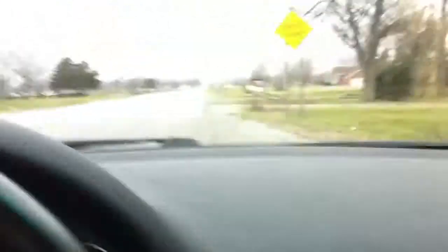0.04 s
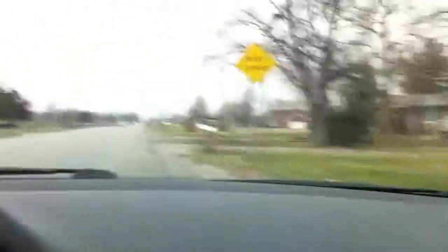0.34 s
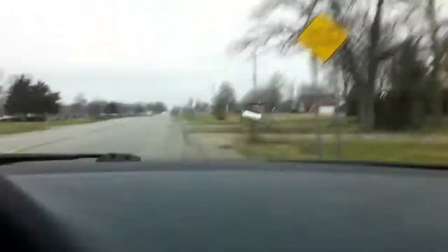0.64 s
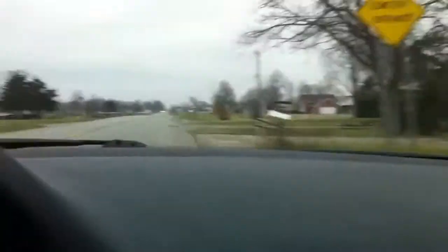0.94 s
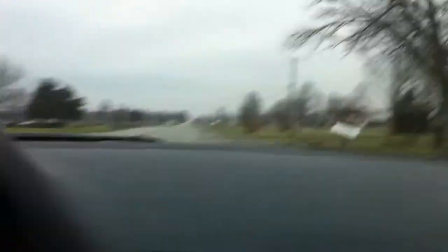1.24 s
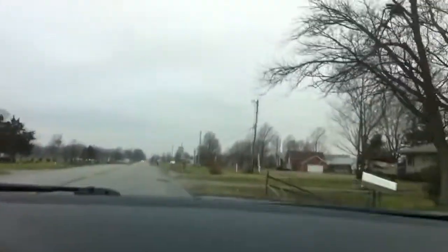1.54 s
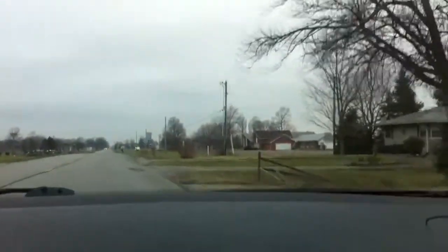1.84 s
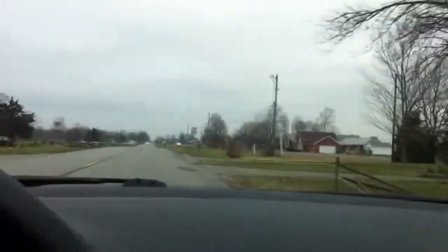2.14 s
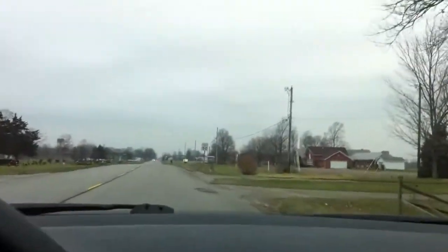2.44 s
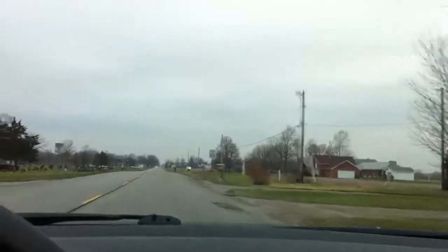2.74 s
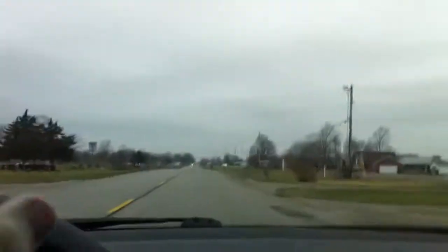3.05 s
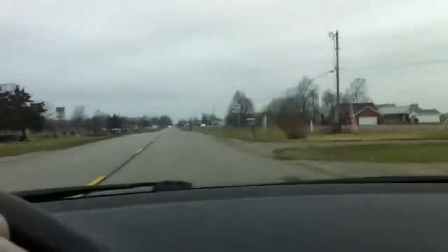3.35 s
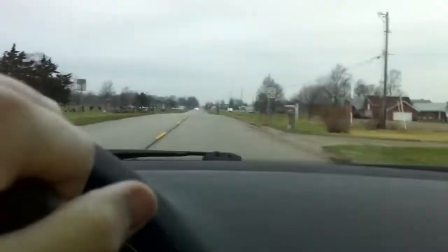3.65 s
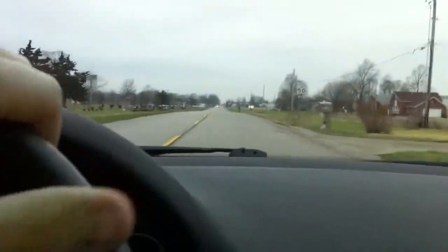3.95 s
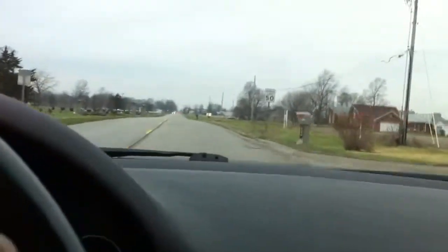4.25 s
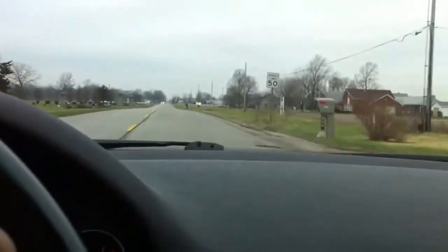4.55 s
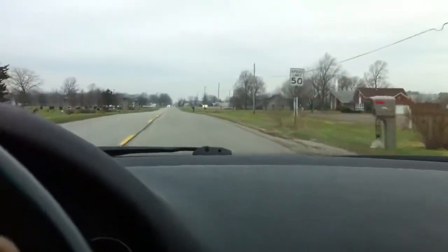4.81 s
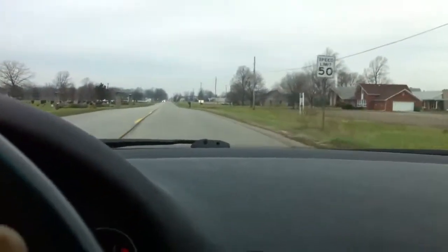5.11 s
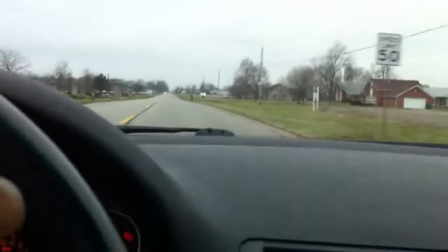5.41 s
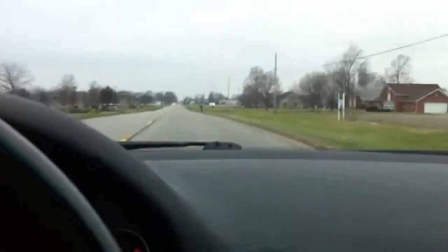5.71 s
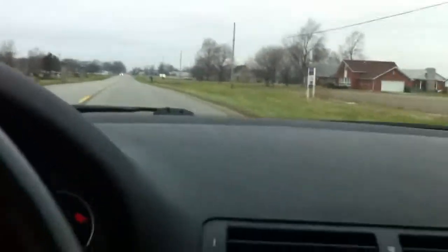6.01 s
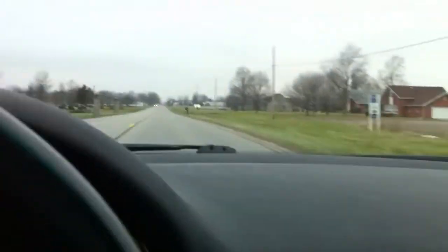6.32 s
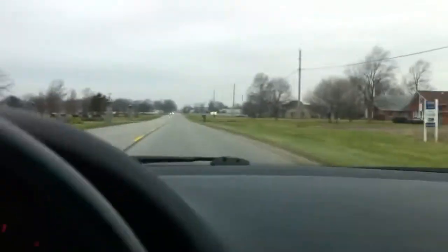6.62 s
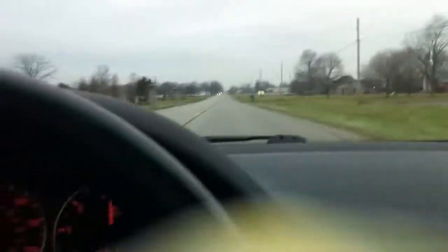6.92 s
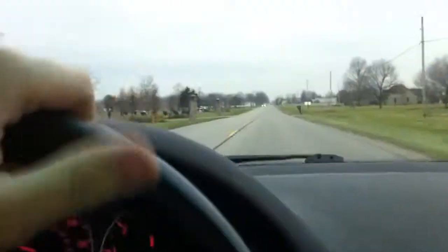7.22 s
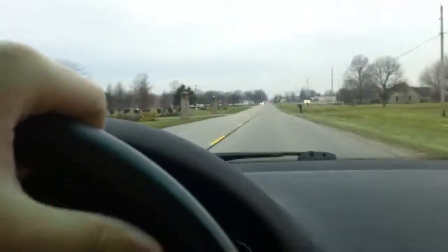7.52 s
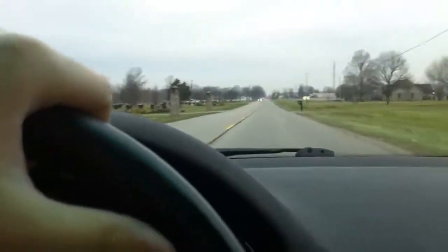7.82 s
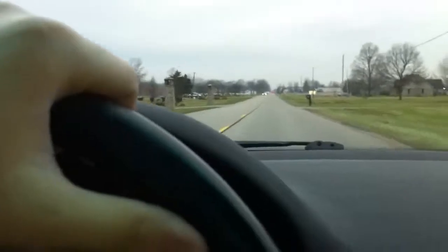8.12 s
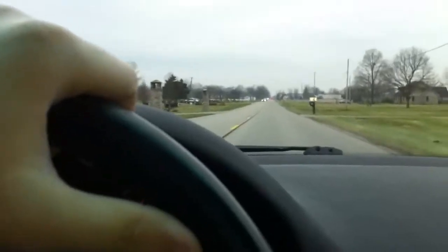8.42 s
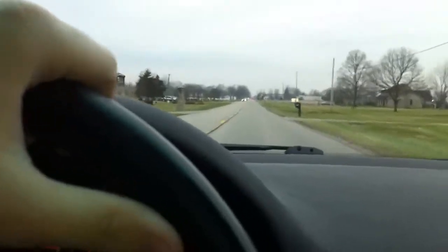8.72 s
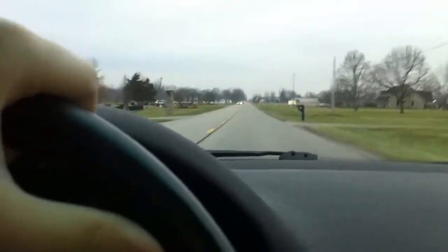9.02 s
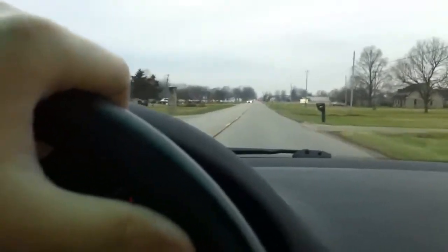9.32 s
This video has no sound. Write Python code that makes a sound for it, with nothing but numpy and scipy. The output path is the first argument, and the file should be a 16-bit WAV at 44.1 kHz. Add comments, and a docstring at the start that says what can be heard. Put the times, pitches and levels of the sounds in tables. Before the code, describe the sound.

A loud, rising axle whine fills a car cabin as the engine pulls through two upshifts above rumbling tyres.

```python
"""Inside a car accelerating through two upshifts. A worn rear axle whines at multiples of pinion speed.
The six-cylinder engine drops at each shift while the whine follows road speed; both sweep the
cabin's resonances. Tyres rumble underneath and loose trim knocks. Cloth rustles, and fingers
rub and tap the hand-held phone, whose case creaks."""
import sys
import numpy as np
from scipy import signal
from scipy.fft import rfft, irfft, next_fast_len
from scipy.io import wavfile

SR = 44100
rng = np.random.default_rng(int(sys.argv[2]) if len(sys.argv) > 2 else 0)


def generate_wav(signal):
    """Clip the signal to [-1, 1] and save it as 16-bit WAV at the path in sys.argv[1]."""
    frames = np.transpose(np.atleast_2d(signal))
    scaled = np.clip(frames, -1, 1) * 32767
    pcm = np.round(scaled).astype(np.int16)
    wavfile.write(sys.argv[1], SR, pcm)


N = 421596
T = np.arange(N) / SR

# tyre rumble: freq_hz, density_db
TYRE_SPECTRUM = [(25, -40), (55, -16.5), (90, -10.5), (125, 0.5), (170, 2), (260, -5), (380, -7),
                 (560, -11.5), (750, -19.5), (1000, -21), (1400, -29), (2000, -36.5), (3000, -39),
                 (5000, -54.5)]
# trim shaken by the road: freq_hz, width_hz, level_db
TRIM_MODES = [(750, 45, -57), (2434, 150, -71)]
# dull cabin bumps: start_s, pitch_hz, peak_db, t60_s
TRIM_KNOCKS = [(2.087, 810, -37, 0.055), (2.29, 760, -27, 0.028), (2.415, 56, -40, 0.21),
               (2.655, 520, -32, 0.064), (2.699, 477, -27.5, 0.034), (2.791, 524, -32, 0.036),
               (4.13, 700, -34, 0.026), (6.651, 620, -32, .03)]
# thin tones: centre_s, half_width_s, pitch_hz, level_db
SQUEAL_EVENTS = [(.13, 0.072, 1287, -61), (.48, .15, 1896, -67.5), (8.85, .2, 1850, -65)]
# cloth: centre_s, half_width_s, level_db
RUSTLE_EVENTS = [(0.317, 0.059, -57.5), (.734, 0.047, -58), (4.056, 0.097, -59.5)]
# cloth hiss: freq_hz, density_db
RUSTLE_SPECTRUM = [(800, -31), (2700, 1), (4400, -8), (5600, -1.5), (6500, -7), (9000, -12), (16000, -32)]

# fingers sliding until the hand settles: time_s, level_db
GRIP_LEVEL = [(0, -60), (1.1, -64.5), (1.7, -58), (2.65, -61.5), (3.0, -59.5), (4.4, -61), (5.5, -61),
              (6.15, -57), (7.3, -60), (7.7, -64)]
# skin hiss: freq_hz, density_db
GRIP_SPECTRUM = [(1500, -17.5), (4000, 3), (7000, -0.5), (10000, -0.5), (13000, 1), (16000, 9)]
# skin scuffs: centre_s, half_width_s, level_db, tilt_db_per_band
SCUFF_EVENTS = [(0.588, 0.028, -70, 10.5), (.801, 0.016, -66, -8), (1.3, .012, -65, 9),
                (1.476, .013, -61.5, 9), (1.527, 0.0075, -61, 20), (1.55, 0.017, -68, -6),
                (2.293, 0.025, -61, 4), (2.663, 0.024, -60.5, -1), (2.702, 0.025, -62, 1),
                (2.82, 0.047, -78, 16), (2.891, 0.017, -60, -4), (3.18, 0.033, -53.5, 2.5),
                (3.282, 0.021, -54.5, 1), (3.547, 0.018, -62.5, -14.5), (3.604, .012, -61, 8),
                (3.832, 0.014, -60, -6), (4.282, 0.009, -55, 0), (5.633, .035, -72, 8),
                (5.718, 0.057, -68, 4), (6.056, 0.068, -65, 1), (6.19, 0.021, -63, 3),
                (6.265, 0.008, -55.5, 0), (6.42, 0.067, -63.5, -1), (6.704, 0.033, -57.5, -5.5),
                (7.231, 0.024, -66.5, -10.5), (7.332, 0.039, -58, 2.5), (7.93, 0.015, -72, -19)]
# scuff noise bands: low_hz, high_hz
SCUFF_EDGES = [(900, 3500), (3500, 9000), (9000, 15800)]
# case creaks: start_s, level_db, decay_s
CREAK_EVENTS = [(1.54, -51, .012), (2.292, -47, .01), (2.694, -48.5, 0.014), (2.963, -57, .006),
                (3.543, -44.5, 0.016), (3.603, -47, 0.0096), (6.264, -46, 0.0065), (6.688, -54, .012),
                (7.926, -57, .008)]
# case rung by slips: freq_hz, width_hz, gain_db
CREAK_RESONANCES = [(1050, 200, -6), (1450, 200, -2), (1970, 170, 0), (2300, 160, -5), (2850, 400, -4),
                    (3700, 500, -7), (5200, 2000, -9)]
# finger taps: start_s, ring_peak_db, tick_db, tilt_db_per_octave
TAP_EVENTS = [(1.2394, -18.5, -39, .5), (1.539, -35, -58, -3), (3.273, -23.5, -52, -4),
              (3.405, -50, -52, 2), (3.603, -38, -46, 0)]
# first contact of a tap: freq_hz, density_db
TICK_SPECTRUM = [(1000, -22), (4000, -21), (6000, 11), (8000, 3), (11000, -22), (16000, -20)]
# case rung by a tap: freq_hz, gain_db, t60_s
CASE_MODES = [(1030, 0, .008), (1280, -6, .007), (2620, -2, .005), (3330, -3.5, .005), (7700, -5, .003)]

# three pulls, two upshifts: time_s, crank_hz
CRANK_SPEED = [(0, 40.6), (.75, 56), (1.2, 64.8), (1.7, 73.3), (1.94, 76), (2.15, 76.2), (2.35, 74.7),
               (2.87, 65.3), (3.23, 51.4), (3.43, 49.2), (3.65, 51.3), (4.55, 63.8), (4.8, 67.1),
               (5.54, 76), (5.8, 78.3), (6, 78.9), (6.34, 69.9), (6.75, 55.2), (7.2, 52.5), (8.68, 60.8),
               (9.56, 64.9)]
# throttle, lifted at each shift: time_s, gain_db
THROTTLE_GAIN = [(0, -9.5), (.7, 0), (1.55, 1), (2.05, -4), (2.5, -10), (3.25, -12.5), (3.65, 1), (4.6, 1),
                 (5.3, 3), (5.85, 1.5), (6.25, -6), (7.0, -9.5), (7.4, 0), (8.3, 1), (9.56, 0)]
# whistle under full load: time_s, pitch_hz, level_db
WHISTLE_GLIDE = [(4.8, 6220, -74), (5.15, 6350, -76), (5.6, 6520, -72), (5.85, 6617, -89)]
# pump, loudest steering out of the turn: time_s, level_db
PUMP_LEVEL = [(0, -54), (.3, -48.5), (.55, -51), (.9, -55), (1.4, -69), (2.2, -66), (9.56, -62.5)]
# low-gear howl: time_s, level_db
HOWL_LEVEL = [(0, -77), (1.15, -52), (1.45, -45.5), (1.68, -61), (2.6, -90)]
# mechanical engine noise: freq_hz, density_db
RASP_SPECTRUM = [(100, -9.5), (250, -4.5), (500, 5), (800, -3.5), (1050, -10), (1400, -1.5), (2000, -9),
                 (2450, -20.5), (3000, -14.5), (4500, -19), (8000, -29), (15000, -96)]
# panels rung by the rasp: freq_hz, width_hz, gain_db
PANEL_MODES = [(1284, 120, -13), (1440, 250, -22), (1800, 61, -28.5), (2306, 160, -14), (2530, 110, -15)]
# firing note before the cabin boom: time_s, level_db
FIRING_LEVEL = [(0, -42), (.25, -39.5), (.7, -43), (1.05, -48), (1.5, -42.5), (1.8, -36), (2.15, -32),
                (2.6, -35), (2.95, -41), (3.25, -38), (3.6, -36), (4.35, -31.5), (4.95, -40), (5.95, -33),
                (6.75, -40), (7.05, -46), (7.4, -37), (8.2, -39), (9.56, -39.5)]
# cabin boom swept by the firing note: freq_hz, width_hz, lift_db
FIRING_MODE = (187, 8, 7)
# orders raised or sunk in the growl: crank_multiple, gain_db
GROWL_ACCENTS = [(1.5, -0.5), (2.5, -0.5), (3.5, 0), (4, -5.5), (5, -2), (6, 0.5), (8, 0.5), (9.5, -3),
                 (10, 1), (12, 1.5), (16, 3), (17, 3), (22.5, 4.5)]
# exhaust resonances: freq_hz, width_hz, lift_db
EXHAUST_MODES = [(229, 15, 10), (263.7, 35, 23.5), (345, 76, 10.5)]
# body shell resonances: freq_hz, width_hz, lift_db
SHELL_MODES = [(110, 30, 8), (360, 22, 5), (430, 40, 4), (750, 90, 4)]
# cabin path to the ear: freq_hz, gain_db
CABIN_RESPONSE = [(40, -29), (80, -11), (165, -8), (270, 1), (380, -7.5), (435, -7.5), (490, -7.5),
                  (575, -7), (665, -10), (740, -13.5), (805, -12.5), (905, -14), (1000, -17.5), (1180, -19),
                  (1290, -19.5), (1350, -23.5), (1430, -19.5), (1750, -27), (2100, -31), (2450, -23),
                  (3000, -42.5)]

# road speed, sagging at each shift: time_s, pinion_hz
PINION_SPEED = [(0, 19.3), (.75, 26.3), (1.46, 32.8), (1.94, 36.4), (2.35, 36.7), (2.87, 36.1), (3.1, 36.7),
                (3.7, 41.7), (4.6, 51.5), (5.26, 58.6), (5.9, 63.9), (6.3, 63.6), (7.1, 62.4), (7.8, 67),
                (8.5, 71.9), (9.56, 78.1)]
# wheels driving the gears during shifts: start_s, end_s, lift_db
OVERRUN_SPANS = [(1.93, 3.263, 7), (5.95, 7.355, 2.5)]
# gear tooth whirr: freq_hz, density_db
WHIRR_SPECTRUM = [(700, -30), (1150, 6), (1320, -4), (1450, -24), (1560, 5), (1720, -5), (1850, -6),
                  (2020, -13), (2140, 0), (2250, -9), (2400, -8), (2550, -11), (2750, -14), (3300, -32)]
# strong partials: pinion_multiple, drive_db, best_pinion_hz, loss_one_octave_off_db
WHINE_ORDERS = [(2, -26.5, 67, 5.5), (3, -31, 51, 23.5), (4, -29, 85.5, 2.5), (5, -31, 32.3, 8),
                (6, -37, 30, 10.5), (7, -40.5, 33, 45)]
# weak partials: pinion_multiple, gain_db
WHINE_OVERTONES = [(8, -0.5), (9, -0.5), (10, -3), (11, -6.5), (12, -13), (13, -7), (14, -12.5), (15, -3.5),
                   (16, -9.5), (17, -11.5), (18, -6), (20, -7), (25, -10), (34, -8)]
# axle's path through the body shell: freq_hz, gain_db
BODY_RESPONSE = [(40, -56), (100, -29), (112, -15), (131, -18), (150, -2), (172, -2), (182, -1.5),
                 (191, -4.5), (222, -3), (242, 2.5), (261, -4), (285, 2), (318, -1), (350, -6), (400, -2.5)]
# cabin booms swept by the unbalance hum: freq_hz, width_hz, lift_db
HUM_MODES = [(56, 6, 4.2), (74.3, 10, 11.2)]

SHAFT_REF_HZ = 60


def undb(db):
    """Decibels to gain."""
    return 10 ** (np.asarray(db) / 20)


def curves(rows):
    """Each column after time_s, per sample."""
    times_s, *columns = np.transpose(rows)
    return [np.interp(T, times_s, column) for column in columns]


def response_db(points, hz):
    """Spectrum read on a log-frequency axis."""
    points_hz, db = np.transpose(points)
    return np.interp(np.log(hz + 1), np.log(points_hz), db)


def unit(x):
    """Scale to rms 1."""
    return x / np.sqrt(np.mean(x ** 2))


def noise(spectrum):
    """Coloured noise, rms 1."""
    size = next_fast_len(N)
    gain = undb(response_db(spectrum, np.fft.rfftfreq(size, 1 / SR)))
    return unit(irfft(rfft(rng.standard_normal(size)) * gain, size)[:N])


def walk(rate_hz):
    """Random wander, rms 1."""
    steps = rng.standard_normal(4096)
    return unit(np.interp(T * rate_hz, np.arange(len(steps)), steps))


def partial(turns, order, flutter_db, flutter_hz):
    """One shaft order with amplitude and phase flutter, rms near 1."""
    phase = 2 * np.pi * ((order * turns + rng.random()) % 1).astype(np.float32)
    depth = undb(flutter_db)
    in_phase = 1 + depth * walk(flutter_hz)
    quadrature = depth * walk(flutter_hz)
    return np.sqrt(2) * (in_phase * np.sin(phase) + quadrature * np.cos(phase))


def octaves(hz):
    """Shaft speed in doublings above the reference."""
    return np.log2(hz / SHAFT_REF_HZ)


def resonance_db(hz, modes):
    """Lift of a partial gliding through resonances."""
    return sum(db / (1 + (2 * (hz - mode_hz) / width_hz) ** 2) for mode_hz, width_hz, db in modes)


def standing_waves_db(hz, depth_db):
    """Dense cabin modes swell and hollow a gliding partial."""
    mode_hz = np.arange(0, 4000, 22)
    return depth_db * np.interp(hz, mode_hz, rng.uniform(-1, 1, len(mode_hz)))


def ring_through(x, hz, width_hz):
    """One resonator driven by x, rms 1."""
    return unit(signal.lfilter(*signal.iirpeak(hz, hz / width_hz, fs=SR), x))


def damped_sine(t, hz, t60_s):
    """One struck mode."""
    return np.sin(2 * np.pi * hz * t) * np.exp(-np.log(1000) * t / t60_s)


def tyres():
    """Rumble grows with speed; it and the ringing trim waver with the road surface."""
    pinion_hz, = curves(PINION_SPEED)
    surface_db = .8 * walk(6)
    rumble_db = -38 + 3.9 * np.log2(pinion_hz / pinion_hz.mean())
    shaking = rng.standard_normal(N)
    trim = sum(undb(db) * ring_through(ring_through(shaking, hz, width_hz), hz, width_hz)
               for hz, width_hz, db in TRIM_MODES)
    return (undb(rumble_db) * noise(TYRE_SPECTRUM) + trim) * undb(surface_db)


def knocks():
    """Loose trim knocks and dies away."""
    out, t = np.zeros(N), T[:SR // 4]
    for start_s, hz, peak_db, t60_s in TRIM_KNOCKS:
        start = int(start_s * SR)
        out[start:start + len(t)] += undb(peak_db) * damped_sine(t, hz, t60_s)
    return out


def squeals():
    """Thin, wavering tones swell and fade."""
    out = np.zeros(N)
    for centre_s, half_width_s, hz, db in SQUEAL_EVENTS:
        swell = undb(db) * np.exp(-((T - centre_s) / half_width_s) ** 2)
        out += swell * partial(hz * T, 1, flutter_db=-9, flutter_hz=35)
    return out


def rustles():
    """Cloth brushes by in short hisses."""
    swells = sum(undb(db) * np.exp(-2 * ((T - centre_s) / half_width_s) ** 2)
                 for centre_s, half_width_s, db in RUSTLE_EVENTS)
    return swells * noise(RUSTLE_SPECTRUM) * undb(1.5 * walk(120))


def fingers():
    """Skin slides on the case: fine hiss, grainy scuffs."""
    grip_db, = curves(GRIP_LEVEL)
    out = noise(GRIP_SPECTRUM) * undb(grip_db + 1.1 * walk(70) + 1.9 * walk(12))
    for band, edges_hz in enumerate(SCUFF_EDGES):
        bandpass = signal.butter(2, edges_hz, "band", fs=SR, output="sos")
        grains = rng.standard_normal(N) * undb(2.5 * walk(350))
        grains = unit(signal.sosfilt(bandpass, grains))
        for centre_s, half_width_s, db, tilt_db in SCUFF_EVENTS:
            near = np.abs(T - centre_s) < 2 * half_width_s
            swell = np.exp(-2.2 * ((T[near] - centre_s) / half_width_s) ** 2)
            out[near] += undb(db + tilt_db * (band - 1)) * swell * grains[near]
    return out


def creaks(slips_per_s=1600):
    """Quick runs of slips under the grip ring the case."""
    slips = (rng.random(N) < slips_per_s / SR) * rng.uniform(.45, 1, N)
    ring = sum(undb(db) * ring_through(slips, hz, width_hz) for hz, width_hz, db in CREAK_RESONANCES)
    envelope = sum(undb(db) * (T >= start_s) * np.exp(-np.abs(T - start_s) / decay_s)
                   for start_s, db, decay_s in CREAK_EVENTS)
    return envelope * unit(ring)


def taps(tick_decay_s=.00082):
    """A fingertip hits the case: crisp tick, short modal ring."""
    out, t = np.zeros(N), T[:SR // 20]
    tick = noise(TICK_SPECTRUM)
    for start_s, peak_db, tick_db, tilt_db in TAP_EVENTS:
        ring = 0
        for hz, db, t60_s in CASE_MODES:
            detune = 1 + .015 * rng.standard_normal()
            mode_db = db + tilt_db * np.log2(hz / CASE_MODES[0][0])
            ring += undb(mode_db) * damped_sine(t, hz * detune, t60_s)
        start = int(start_s * SR)
        out[start:start + len(t)] += undb(peak_db) * ring / np.abs(ring).max()
        out += undb(tick_db) * tick * np.exp(-np.abs(T - start_s) / tick_decay_s)
    return out


def whistle():
    """Breathy whistle over a weaker, lower tone, near the top of the middle gear."""
    hz, db = curves(WHISTLE_GLIDE)
    sounding = (T > WHISTLE_GLIDE[0][0]) & (T < WHISTLE_GLIDE[-1][0])
    phase = 2 * np.pi * np.cumsum(hz) / SR
    upper = walk(160) * np.sin(phase)
    lower = undb(-7) * walk(300) * np.sin(.865 * phase)
    return sounding * undb(db) * np.sqrt(2) * (upper + lower)


def pump(crank_turns, vane_order=11.2):
    """Belt-driven vanes sing at a fixed multiple of crank speed."""
    level_db, = curves(PUMP_LEVEL)
    tone = sum(undb(db) * partial(crank_turns, k * vane_order, flutter_db=-8, flutter_hz=14)
               for k, db in enumerate((0, -18, -22), start=1))
    return undb(level_db) * tone


def engine_load_db(crank_hz, db_per_octave=11.5):
    """Base level of rasp and growl, from speed and throttle."""
    throttle_db, = curves(THROTTLE_GAIN)
    return -47 + db_per_octave * octaves(crank_hz) + .1 * throttle_db


def rasp(crank_hz, crank_turns):
    """Each firing gates mechanical noise, which also rings the panels."""
    phase = 2 * np.pi * crank_turns
    gate = 1 + .24 * np.cos(3 * phase) + .057 * np.cos(1.5 * phase) + .13 * np.cos(phase / 2)
    bursts = gate * noise(RASP_SPECTRUM) * undb(.87 * walk(14))
    panels = sum(undb(db + 2.9 * walk(5.2)) * ring_through(bursts, hz, width_hz)
                 for hz, width_hz, db in PANEL_MODES)
    return undb(engine_load_db(crank_hz) - 8) * (bursts + panels)


def howl(crank_turns):
    """Under hard pull the firing note's third harmonic sings out."""
    level_db, = curves(HOWL_LEVEL)
    return undb(level_db) * partial(crank_turns, 9, flutter_db=-10, flutter_hz=14)


def growl(crank_hz, crank_turns, bank_order_db=1.5, half_order_db=-4, exhaust_share=.46):
    """Each bank fires 1.5 times a turn; unequal cylinders fill in the half orders."""
    throttle_db, = curves(THROTTLE_GAIN)
    accent_db = dict(GROWL_ACCENTS)
    orders = np.r_[np.arange(1.5, 22, .5), np.arange(22.5, 39, 1.5)]
    uneven_turns = crank_turns + .004 * walk(28)  # uneven combustion jogs the crank
    out = np.zeros(N)
    for k in np.setdiff1d(orders, (3, 4.5)):  # these two are the drone
        hz = k * crank_hz
        order_db = bank_order_db if k % 1.5 == 0 else half_order_db * (k % 1 > 0)
        path_db = response_db(CABIN_RESPONSE, hz) + standing_waves_db(hz, depth_db=7)
        path_db += exhaust_share * resonance_db(hz, EXHAUST_MODES) + resonance_db(hz, SHELL_MODES)
        line = partial(uneven_turns, k, flutter_db=-7.5, flutter_hz=15)
        out += undb(order_db + accent_db.get(k, 0) + path_db) * line
    return undb(engine_load_db(crank_hz) + throttle_db - 4.7) * out


def drone(crank_hz, crank_turns):
    """Three firings a turn sweep a cabin boom; the fifth above sweeps the exhaust modes."""
    throttle_db, = curves(THROTTLE_GAIN)
    firing_db = curves(FIRING_LEVEL)[0] + resonance_db(3 * crank_hz, [FIRING_MODE])
    fifth_db = -56 + .83 * throttle_db + resonance_db(4.5 * crank_hz, EXHAUST_MODES)
    firing = undb(firing_db) * partial(crank_turns, 3, flutter_db=-17, flutter_hz=25)
    fifth = undb(fifth_db) * partial(crank_turns, 4.5, flutter_db=-18, flutter_hz=25)
    return firing + fifth


def overrun_db(ramp_s=.29):
    """How hard the wheels drive the gears during shifts."""
    return sum(db * np.clip(np.minimum(T - start_s, end_s - T) / ramp_s, 0, 1)
               for start_s, end_s, db in OVERRUN_SPANS)


def whirr(pinion_turns, throb_depth=.35):
    """On overrun the teeth run on their worn backs, throbbing once a pinion turn."""
    lift_db = overrun_db()
    envelope = undb(-57.5 + 1.5 * walk(7.1)) * lift_db / lift_db.max()
    throb = 1 + throb_depth * np.cos(2 * np.pi * pinion_turns)
    return envelope * throb * noise(WHIRR_SPECTRUM)


def axle_hum(pinion_hz, pinion_turns, db_per_octave=30.5):
    """Unbalance hums once a turn, growing with speed."""
    level_db = -56 + db_per_octave * octaves(pinion_hz) + resonance_db(pinion_hz, HUM_MODES)
    return undb(level_db) * partial(pinion_turns, 1, flutter_db=-23, flutter_hz=20)


def axle_whine(pinion_hz, pinion_turns, overrun_order=5, overtone_db=-48.5):
    """The worn pinion repeats its error every turn: harmonics that swell at the body's booms."""
    out = np.zeros(N)
    for k, drive_db, best_hz, loss_db in WHINE_ORDERS:
        level_db = drive_db - loss_db * np.log2(pinion_hz / best_hz) ** 2
        level_db += response_db(BODY_RESPONSE, k * pinion_hz)
        if k == overrun_order:
            level_db += overrun_db()
        out += undb(level_db) * partial(pinion_turns, k, flutter_db=-15.5, flutter_hz=22)
    for k, gain_db in WHINE_OVERTONES:
        level_db = overtone_db + gain_db + response_db(CABIN_RESPONSE, k * pinion_hz)
        out += undb(level_db) * partial(pinion_turns, k, flutter_db=-5, flutter_hz=7)
    return out


def scene():
    """Mono mix at the driver's seat."""
    pinion_hz, = curves(PINION_SPEED)
    crank_hz, = curves(CRANK_SPEED)
    pinion_turns, crank_turns = np.cumsum(pinion_hz) / SR, np.cumsum(crank_hz) / SR
    axle = axle_hum(pinion_hz, pinion_turns) + axle_whine(pinion_hz, pinion_turns) + whirr(pinion_turns)
    engine = drone(crank_hz, crank_turns) + growl(crank_hz, crank_turns) + howl(crank_turns)
    engine += rasp(crank_hz, crank_turns) + pump(crank_turns) + whistle()
    background = squeals() + tyres() + knocks()
    handling = fingers() + rustles() + creaks() + taps()
    return (background + handling + engine + axle)[None]


def record(dry):
    """The phone adds a thin electronic tone and cuts the top."""
    tone_hz, cutoff_hz = 15000, 15850
    tone = undb(-74) * np.sqrt(2) * np.sin(2 * np.pi * tone_hz * T)
    return signal.sosfilt(signal.ellip(10, .2, 70, cutoff_hz, fs=SR, output="sos"), dry + tone)


dry = scene()
out = record(dry)
generate_wav(out)
```